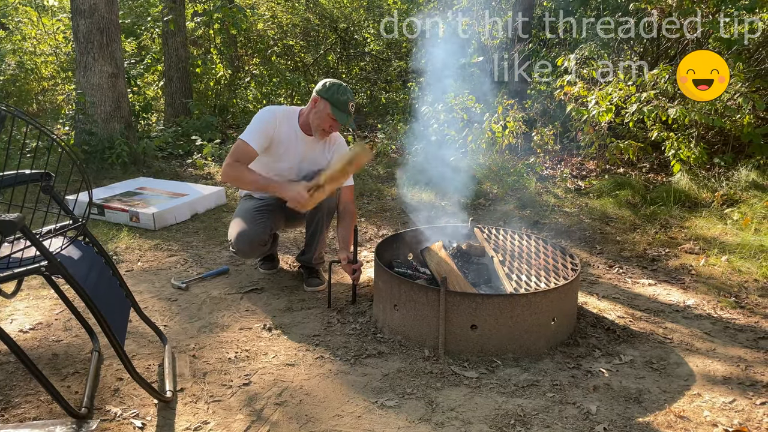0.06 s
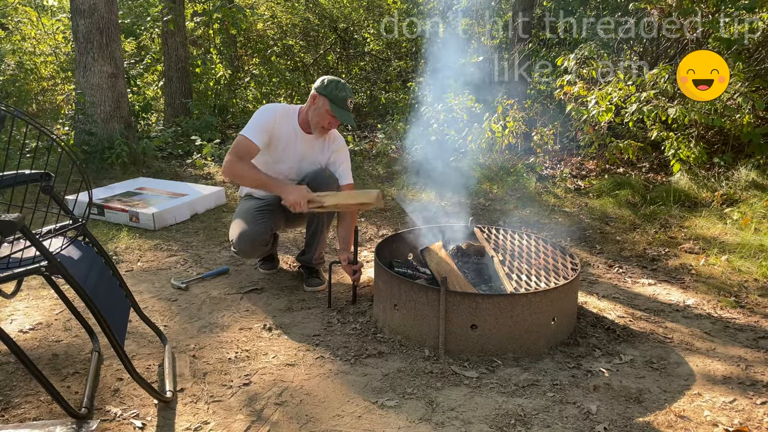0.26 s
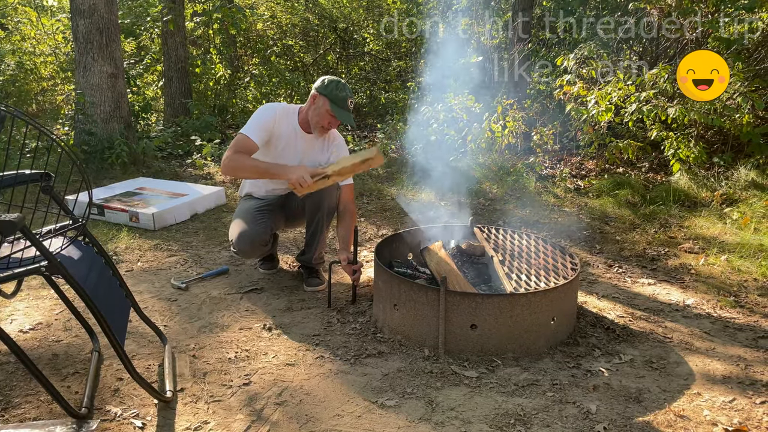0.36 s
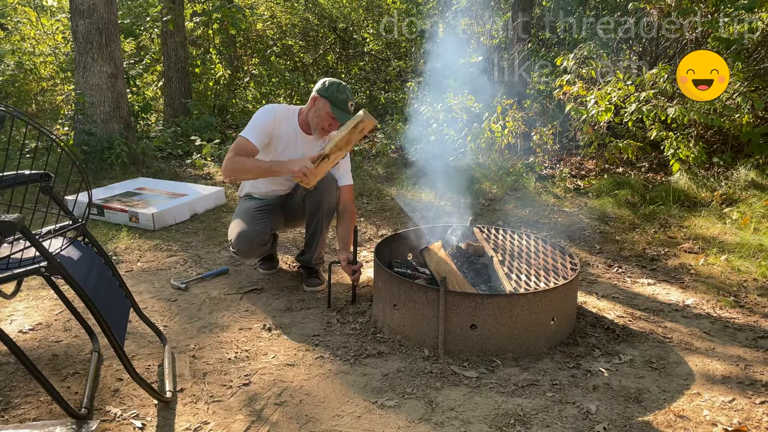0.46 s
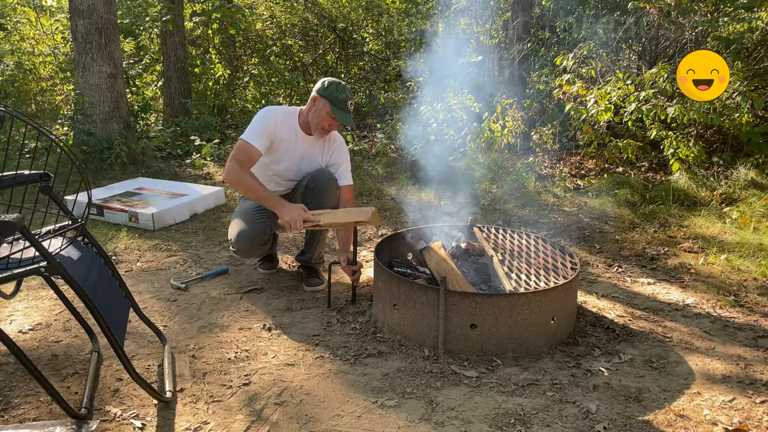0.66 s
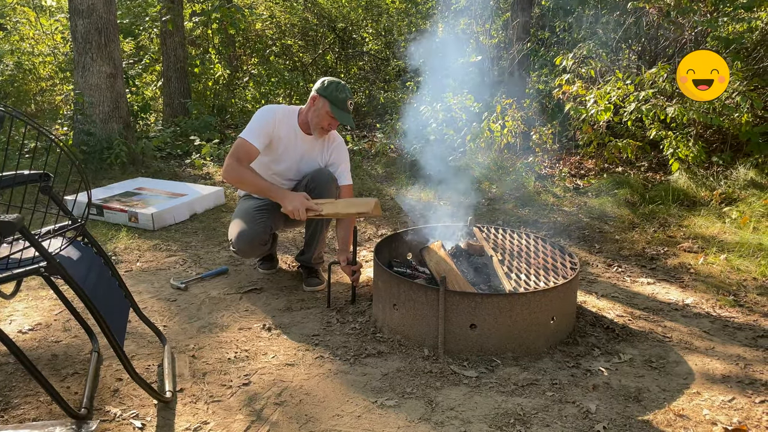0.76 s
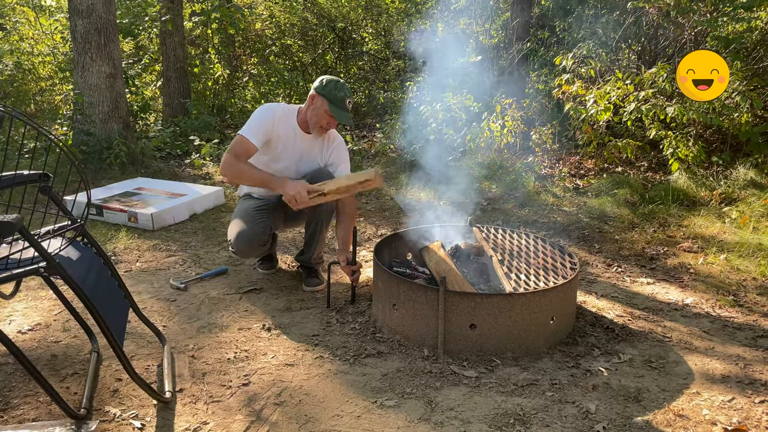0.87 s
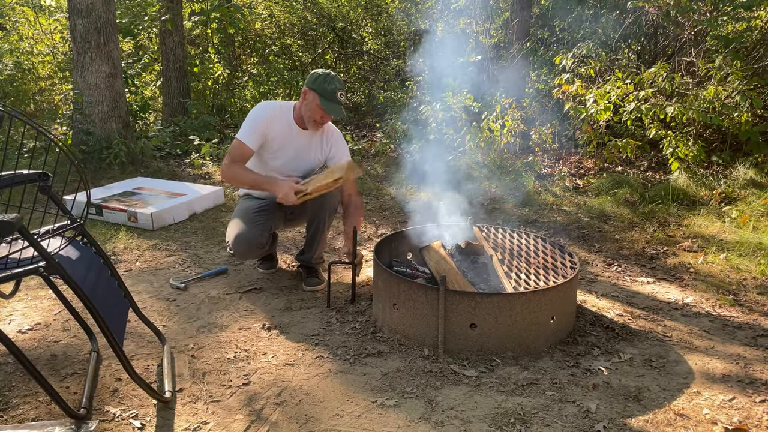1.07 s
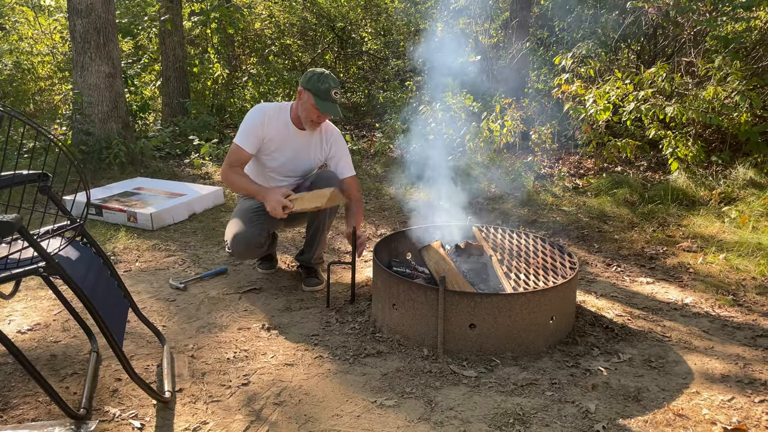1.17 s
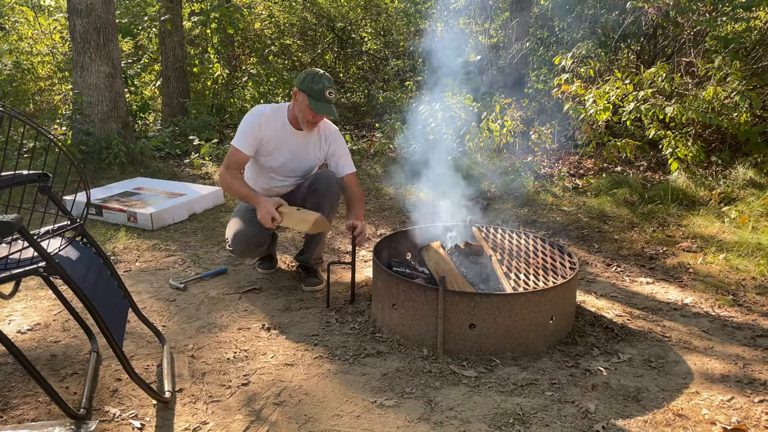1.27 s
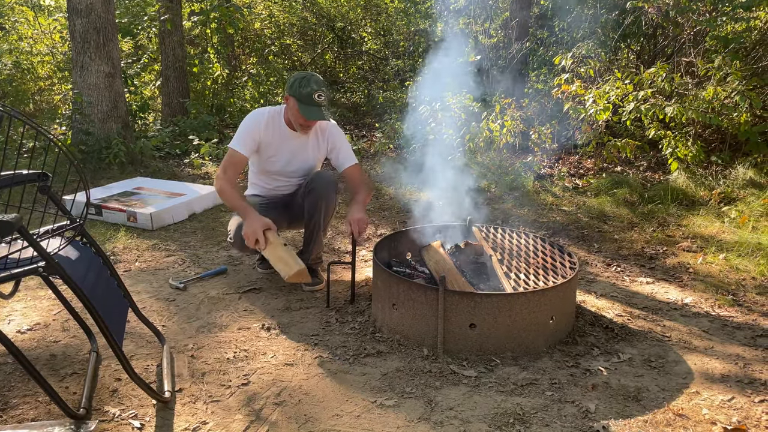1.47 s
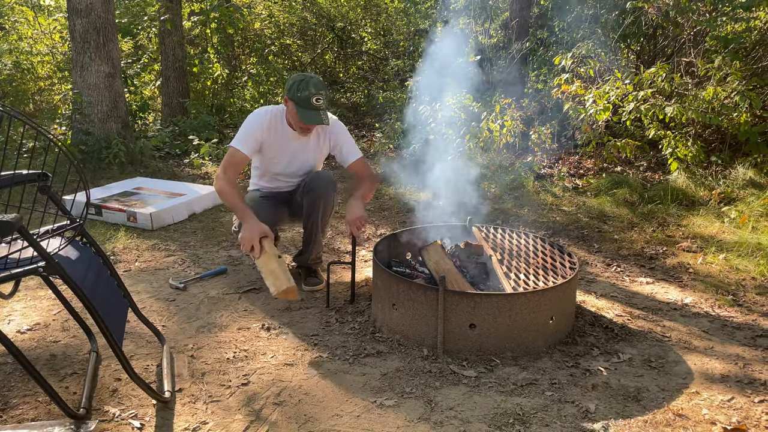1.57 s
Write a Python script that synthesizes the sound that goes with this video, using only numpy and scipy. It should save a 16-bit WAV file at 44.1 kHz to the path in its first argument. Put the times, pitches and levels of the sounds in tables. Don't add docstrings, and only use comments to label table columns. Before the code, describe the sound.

Firewood log knocks hard twice on a steel stake outdoors, with insects trilling and fire ticking

```python
import sys
import numpy as np
from scipy import signal
from scipy.fft import rfft, irfft, next_fast_len
from scipy.io import wavfile
from scipy.ndimage import map_coordinates

SR = 44100
rng = np.random.default_rng(int(sys.argv[2]) if len(sys.argv) > 2 else 0)


def natural_amplitude(level_db):
    exponent = np.asarray(level_db, float) / 20
    return 10 ** exponent


def generate_wav(sig):
    pcm = np.round(np.clip(np.atleast_2d(sig).T, -1, 1) * 32767).astype(np.int16)
    wavfile.write(sys.argv[1], SR, pcm)


N = 70560


def unit(x):
    return x / np.sqrt(np.mean(x ** 2) + 1e-20)


def along(points, hz):
    point_hz, value = np.transpose(points)
    return np.interp(np.log(hz + 1), np.log(point_hz + 1), value)


def wobble(rate):
    knots = rng.standard_normal(int(N * rate / SR) + 4)
    return map_coordinates(knots, [np.arange(N) * rate / SR])


def filtered(x, response):
    n = x.shape[-1]
    m = next_fast_len(n + 8192)
    return irfft(rfft(x, m) * response(np.fft.rfftfreq(m, 1 / SR)), m)[..., :n]


def band(hz, width_hz):
    return lambda f: 1j * f * width_hz / (hz * hz - f * f + 1j * f * width_hz)


def toned_noise(shape, gain):
    return unit(filtered(rng.standard_normal(shape), gain))


def rush(gain):
    # hz, correlation
    likeness = [(60, 0.48), (180, 0.71), (550, 0.0), (1650, -0.55), (4970, 0.32), (15000, -0.0)]

    def spread(hz):
        turn = np.arccos(np.clip(along(likeness, hz), -1, 1)) / 2
        return gain(hz) * [np.cos(turn), np.sin(turn)]

    mid, side = filtered(rng.standard_normal((2, N)), spread)
    return unit(np.array([mid + side, mid - side]))


def add(track, s, sound):
    part = track[..., round(s * SR):][..., :sound.shape[-1]]
    part += sound[..., :part.shape[-1]]


def ring(modes, t, pitch=1):
    total = 0
    for hz, db, t60 in modes:
        swell = 1 - np.exp(-t * hz)
        total = total + natural_amplitude(db - 60 * t / t60) * swell * np.sin(2 * np.pi * hz * pitch * t)
    return total


def contact_force(contact_ms):
    rebound_s, rebound_db = 0.005242, -18

    def response(hz):
        rebound = natural_amplitude(rebound_db) * np.exp(-2j * np.pi * hz * rebound_s)
        return (1 + rebound) / (1 + 1j * hz * contact_ms / 1000) ** 2

    return response


def steel(t, force, crack_db, extra_db):
    # pitch_hz, level_db, t60_s
    stake = [(1207, -18, .04), (1418, -13, .032), (1634, -6, .036), (2860, -19, .04), (3320, -30, .02),
             (4300, -28, .03), (4850, -38, .03)]
    # hz, level_db
    crack_tone = [(800, -20.5), (2500, -8), (6000, 1), (8000, 0), (9300, 1), (11000, -19), (14000, -15.5),
                  (17000, -34.5)]
    steel_db, crack_t60, lead_s = 2, .009, .0011
    crack = toned_noise(len(t), lambda hz: natural_amplitude(along(crack_tone, hz))) * natural_amplitude(crack_db - 60 * t / crack_t60)
    onset = np.clip(t / lead_s, 0, 1) ** 2
    return onset * (natural_amplitude(steel_db + extra_db) * filtered(ring(stake, t), force) + crack)


def wood(t, force, pitch, upper_db):
    # pitch_hz, level_db, t60_s
    log_body = [(319, 1.5, 0.037), (511.7, 2.5, 0.029), (696, -5, 0.049), (2237, -4, 0.011),
                (2646, -12, 0.012)]
    # pitch_hz, level_db, t60_s
    log_upper = [(815.3, 2, 0.014)]
    grip_s, grip_db = 0.0081, -10
    grip = natural_amplitude(grip_db / (1 + np.exp(np.clip((grip_s - t) / 0.00043, -50, 50))))
    body = ring(log_body, t, pitch) + natural_amplitude(upper_db) * ring(log_upper, t, pitch)
    return -grip * filtered(body, force)


def thud(t):
    # pitch_hz, level_db, t60_s
    soil = [(82.8, -15.5, 0.087), (102, -15, 0.081), (150, -24.5, 0.13)]
    return ring(soil, t)


def clearing(hit, smear):
    # hz, t60_s
    trees_t60 = [(100, .5), (500, 0.81), (1200, 0.7), (2000, .5), (8000, 0.34), (14000, .2)]
    # hz, level_db
    trees_tone = [(100, -7), (350, 8), (700, 4.5), (1150, 4), (1600, -4.5), (2200, -8.5), (4000, -5),
                  (10000, -2)]
    near_db, near_t60, trees_db = -18, .06, -24.5
    edge_s, edge_db, edge_wide_s = .088, 5, .028
    hz, t, z = signal.stft(rng.standard_normal((2, 2, SR)), SR, nperseg=256)
    edge = edge_db * np.exp(-((t - edge_s) / edge_wide_s) ** 2)
    far_fade = natural_amplitude(along(trees_tone, hz)[:, None] - 60 * t / along(trees_t60, hz)[:, None] + edge)
    near_fade = natural_amplitude(-60 * t / near_t60) * np.ones_like(far_fade)
    near, far = signal.istft(z * np.array([near_fade, far_fade])[:, None], SR, nperseg=256)[1]
    scatter = natural_amplitude(near_db) * signal.fftconvolve(hit[None], near, axes=1) / np.linalg.norm(near[0])
    echo = natural_amplitude(trees_db) * signal.fftconvolve(smear[None], far, axes=1) / np.linalg.norm(far[0])
    mid, side = scatter + echo
    stereo = 0.71 * mid + np.array([.45 * side, -.45 * side])
    return np.pad(stereo, ((0, 0), (200, 0)))


def blows():
    # start_s, level_db, contact_ms, log pitch (factor), echo_db
    knocks = [
        (-.3, 8, 0.22, 1.1, 5.5),
        (0.2117, 9, 0.25, .985, 2.5),
        (.7301, 8.5, 0.4, 1.02, -2),
    ]
    # crack_db, extra_db on the log's upper mode, extra_db on the steel
    landings = [
        (-12, 0, 0),
        (-6, -2, 1),
        (-10, 4.5, -5),
    ]
    # pitch_hz, width_hz, level_db, t60_s
    stake_hum = (2850, 200, -40, .36)
    hum_hz, width_hz, hum_db, hum_t60 = stake_hum
    log_late_s, soil_late_s = .0008, 0.0054
    smear_db, smear_t60 = 3.5, 0.016
    ear_lag_s = .00006
    lead_in_s = 1
    ears = np.array([[1], [-1]])
    out, t = np.zeros((2, N + SR)), np.arange(SR // 2) / SR
    for (s, db, contact_ms, pitch, echo_db), (crack_db, upper_db, steel_db) in zip(knocks, landings):
        force = contact_force(contact_ms)
        hit = steel(t, force, crack_db, steel_db)
        add(hit, log_late_s, wood(t, force, pitch, upper_db))
        add(hit, soil_late_s, thud(t))
        direct = filtered(hit, lambda hz: np.exp(1j * np.pi * hz * ear_lag_s * ears))
        blur = rng.standard_normal(len(t)) * natural_amplitude(smear_db - 60 * t / smear_t60)
        smear = natural_amplitude(echo_db) * filtered(blur, force)
        hum = toned_noise((2, len(t)), lambda f: band(hum_hz, width_hz)(f) ** 2)
        hum = natural_amplitude(hum_db + echo_db - 60 * t / hum_t60) * (hum[0] + .5 * hum)
        add(out, lead_in_s + s, natural_amplitude(db) * direct + hum)
        add(out, lead_in_s + s, natural_amplitude(db) * clearing(hit, smear))
    return out[:, SR:]


def fire():
    # start_s, peak_db, lowest_hz
    ticks = [(.6194, -45, 7000), (0.634, -34, 7000), (0.7, -8, 1200), (0.7855, -26, 6000),
             (0.8006, -27, 5000), (.9199, -43, 5930), (0.9428, -28, 6000), (0.9547, -26, 3630),
             (.961, -40, 5000), (1.0874, -27, 4470), (1.1142, -45.5, 10000), (1.138, -36, 5500),
             (1.2764, -25, 5500), (1.294, -42.5, 6870), (1.323, -33, 7060), (1.4053, -48, 5000)]
    tick_db, tick_t60, top_hz = 1, .0025, 13500
    echo_s, echo_db, echo_t60 = .0018, -16, .016
    out, t = np.zeros((2, N)), np.arange(SR // 40) / SR
    for s, db, low_hz in ticks:
        grain = rng.standard_normal((3, len(t))) * natural_amplitude(-60 * t / tick_t60)
        add(grain, echo_s, natural_amplitude(echo_db - 60 * t / echo_t60) * rng.standard_normal((3, len(t))))

        def edges(hz):
            low_cut = (1j * hz / (low_hz + 1j * hz)) ** 3
            return low_cut / (1 + hz / 8000) / (1 + (hz / top_hz) ** 16)

        add(out, s, natural_amplitude(db + tick_db) * filtered(grain[0] + .6 * grain[1:], edges))
    return out


def scuffs():
    # level_db, centre_hz, width_hz, t60_s
    rubs = [(-50, 1700, 1000, .12), (-34, 222, 80, .09), (-56, 1350, 400, .04), (-59, 2020, 250, .15),
            (-46, 750, 500, .2), (-60, 2000, 1200, .15), (-54, 1500, 1400, .4)]
    rub_starts = [.525, 1.49, 1.489, 1.502, .714, 1.29, .56]
    out, t = np.zeros(N), np.arange(SR // 4) / SR
    for s, (db, hz, width_hz, t60) in zip(rub_starts, rubs):
        rub = toned_noise(len(t), lambda f: band(hz, width_hz)(f) ** 2)
        add(out, s, natural_amplitude(db - 60 * t / t60) * (1 - np.exp(-t / 0.00067)) * rub)
    return out


def insects():
    # time_s, level_db
    chorus_level = [(0.0, -54), (1.372, -51.5), (1.6, -52.5)]
    # hz, level_db per Hz
    chorus_tone = [(1180, -75), (2000, -38), (2260, -29.5), (2360, -18.5), (2910, -9.5), (3650, -7),
                   (5490, -6), (6470, -6), (16000, -36.5)]
    # pitch_hz, width_hz, pulses per s, depth_db, level_db over the chorus
    singers = [(3860, 330, 43, 6, -8), (4410, 130, 58, 3, -15), (6420, 330, 60, 4, -6),
               (6930, 150, 50, 3, -15)]
    t = np.arange(N) / SR
    s, db = np.transpose(chorus_level)
    song = natural_amplitude(-0.5 + .7 * wobble(2.7)) * rush(lambda f: natural_amplitude(along(chorus_tone, f)))
    for hz, width_hz, rate, depth_db, over_db in singers:
        pulses = natural_amplitude(depth_db * np.sin(2 * np.pi * rate * t + .8 * wobble(4)))
        trill = unit(pulses * rush(lambda f: band(hz, width_hz)(f) ** 2))
        song = song + natural_amplitude(over_db + 1.5 * wobble(15)) * trill
    return natural_amplitude(np.interp(t, s, db)) * song


def rumble():
    # hz, level_db per Hz
    murmur_tone = [(12, -48.5), (20, -22), (65, -5), (188, -17), (312, -25.5), (411, -37.5), (450, -33),
                   (580, -53.5), (990, -120)]
    # hz, level_db per Hz
    air_tone = [(240, -24.5), (400, -15), (611, -8.5), (714, 1.5), (1560, -7), (2600, -8.5), (3380, -46.5),
                (5720, -120)]
    murmur_db, air_db = -45.5, -64
    lumps = natural_amplitude(2 * wobble(20))
    murmur = unit(lumps * rush(lambda f: natural_amplitude(along(murmur_tone, f))))
    air = natural_amplitude(air_db + 1.1 * wobble(18)) * rush(lambda f: natural_amplitude(along(air_tone, f)))
    return natural_amplitude(murmur_db) * murmur + air


def scene():
    return blows() + fire() + scuffs() + insects() + rumble()


def band_limit(x):
    return signal.sosfilt(signal.butter(12, 20000, fs=SR, output="sos"), x)


def record(dry):
    full_scale, knee, mic_top_hz = 1.0, 14, 15500
    clipped = dry / (1 + np.abs(dry / full_scale) ** knee) ** (1 / knee)
    mix = filtered(clipped, lambda hz: 1 / (1 + (hz / mic_top_hz) ** 8))
    return band_limit(mix)


dry = scene()
out = record(dry)
generate_wav(out)
```